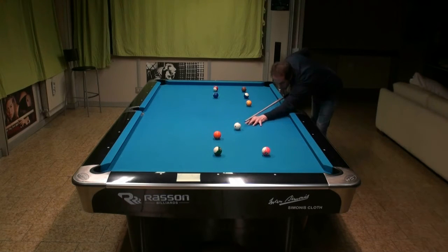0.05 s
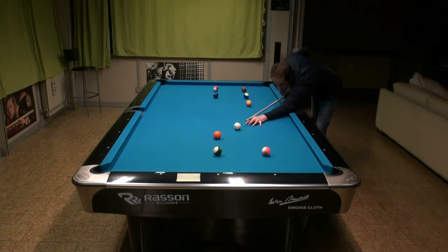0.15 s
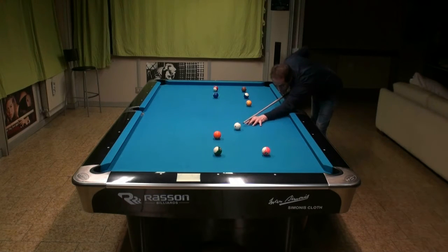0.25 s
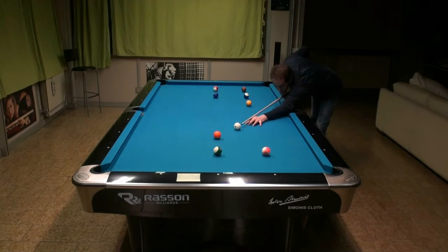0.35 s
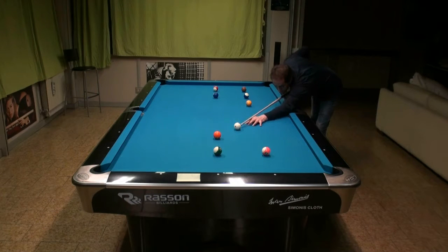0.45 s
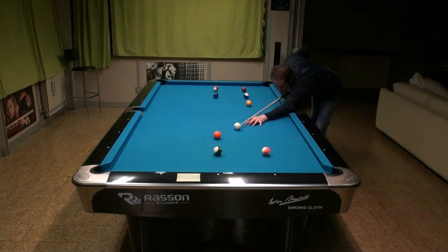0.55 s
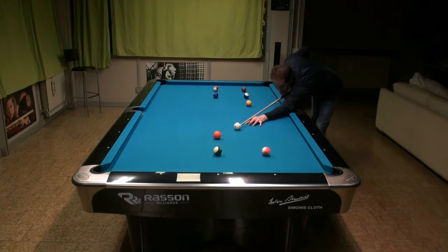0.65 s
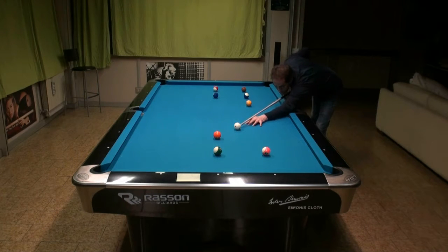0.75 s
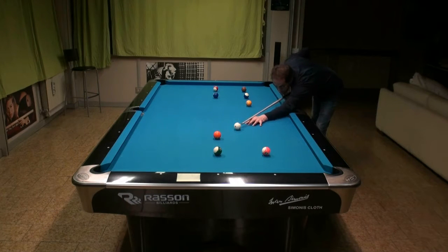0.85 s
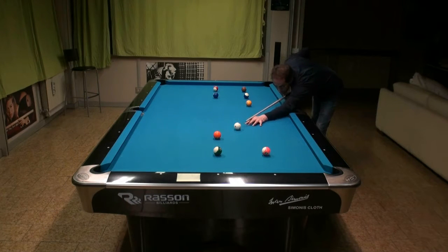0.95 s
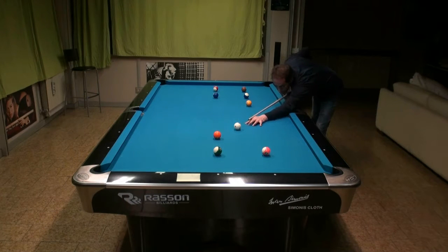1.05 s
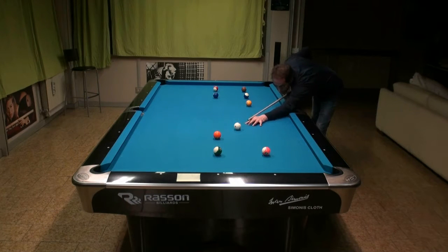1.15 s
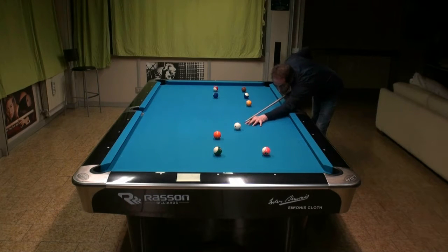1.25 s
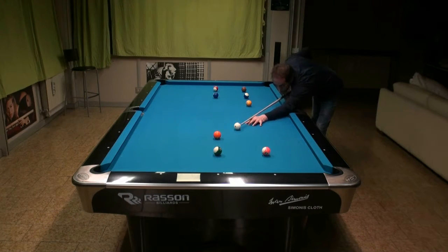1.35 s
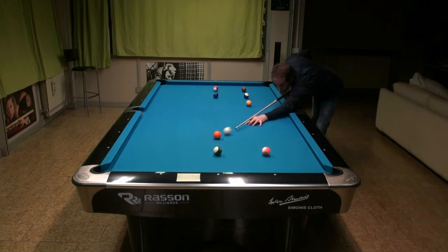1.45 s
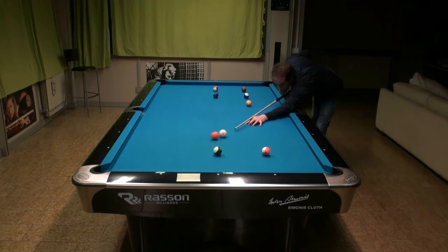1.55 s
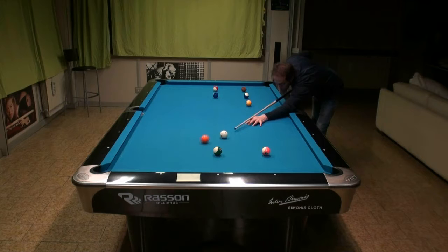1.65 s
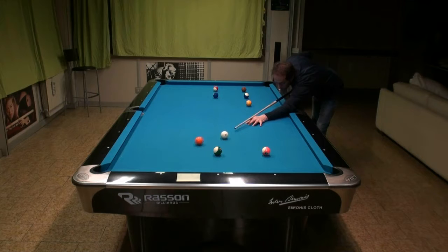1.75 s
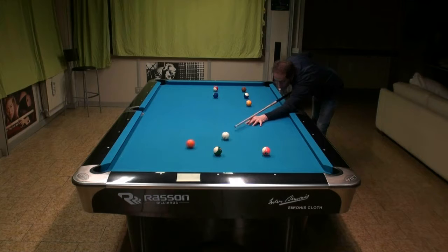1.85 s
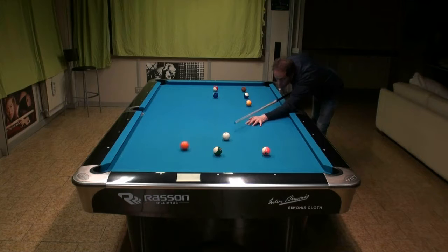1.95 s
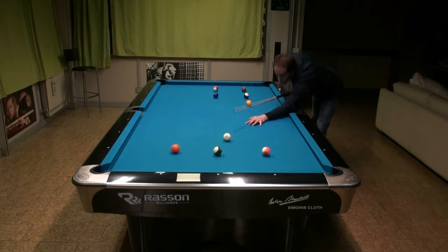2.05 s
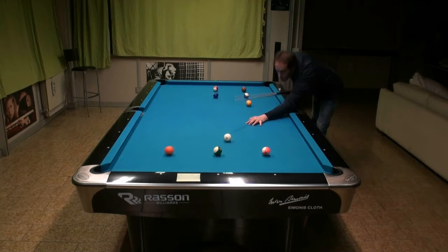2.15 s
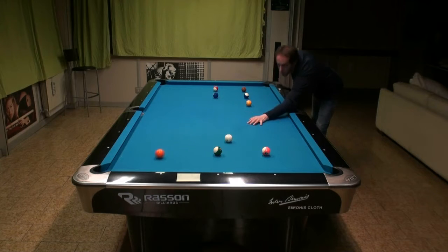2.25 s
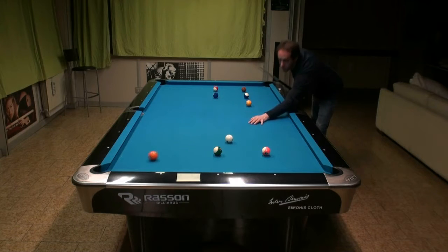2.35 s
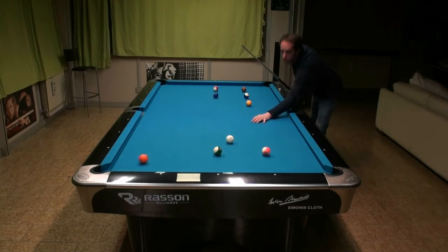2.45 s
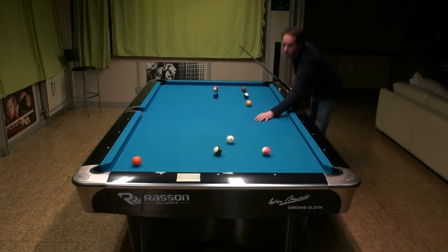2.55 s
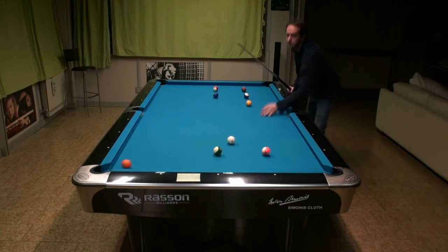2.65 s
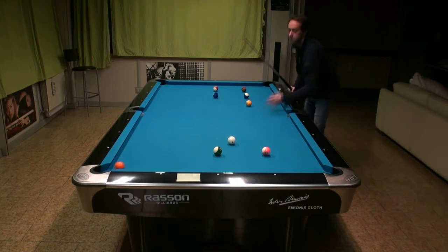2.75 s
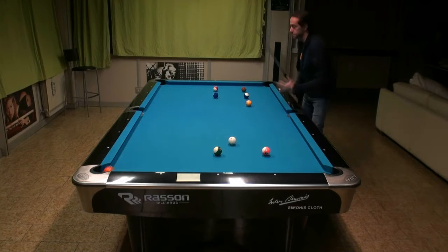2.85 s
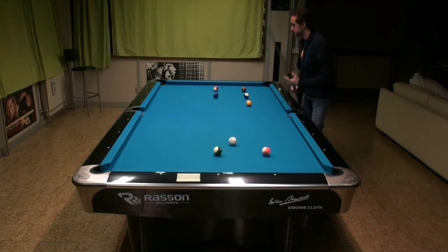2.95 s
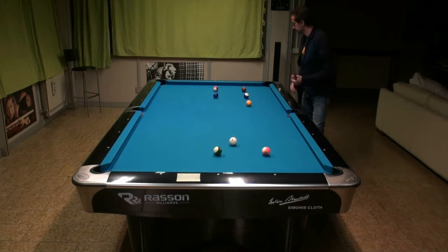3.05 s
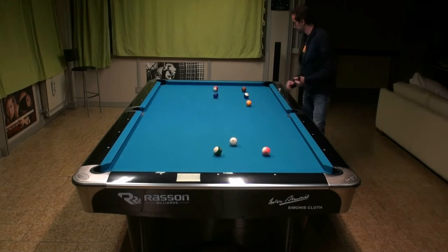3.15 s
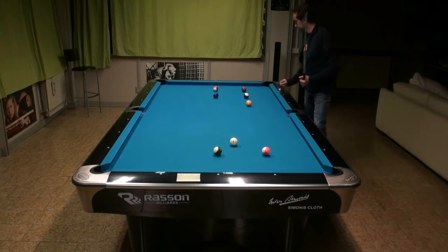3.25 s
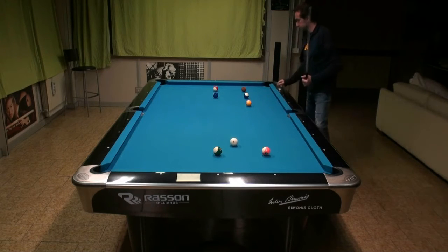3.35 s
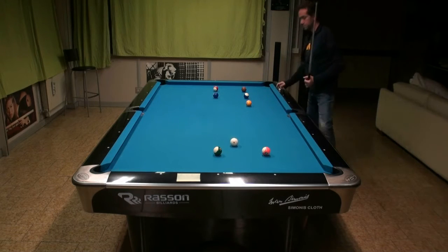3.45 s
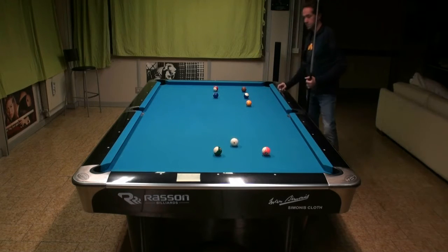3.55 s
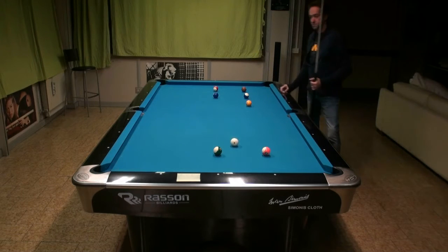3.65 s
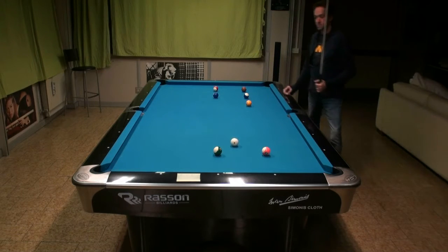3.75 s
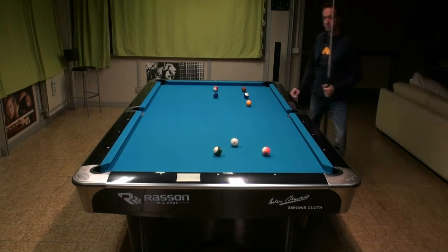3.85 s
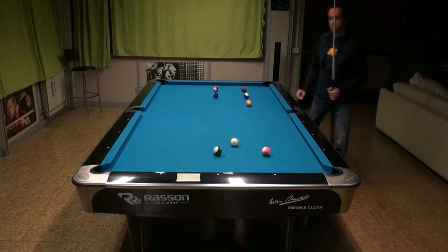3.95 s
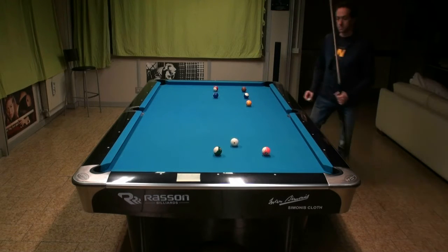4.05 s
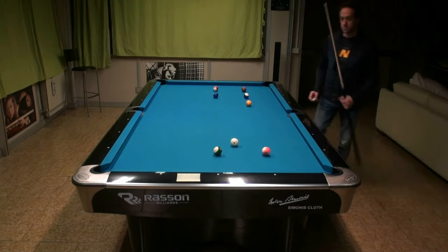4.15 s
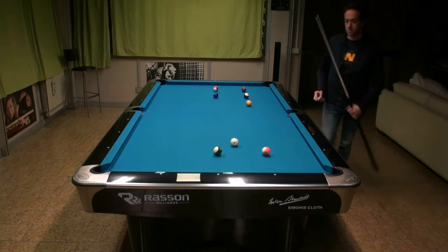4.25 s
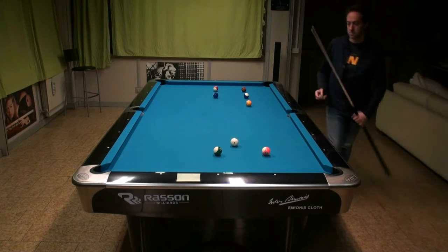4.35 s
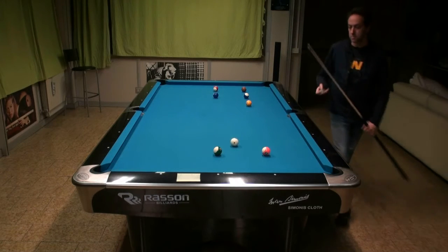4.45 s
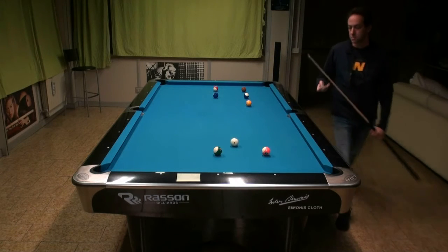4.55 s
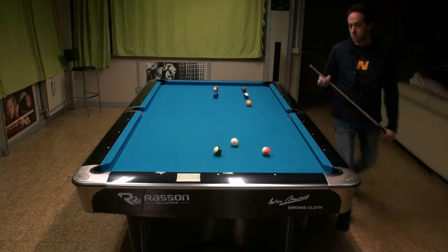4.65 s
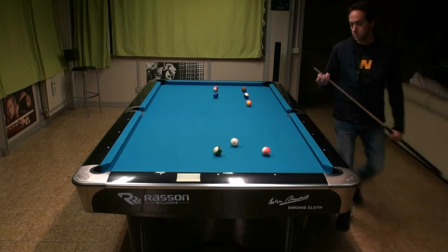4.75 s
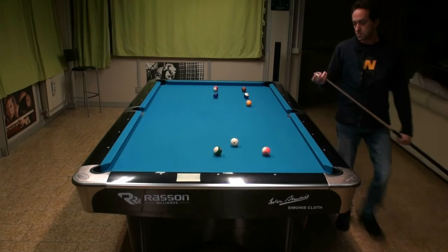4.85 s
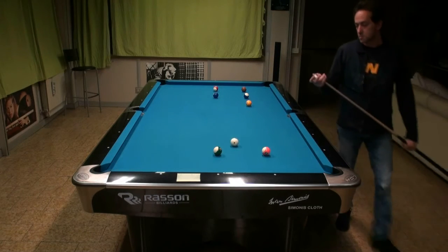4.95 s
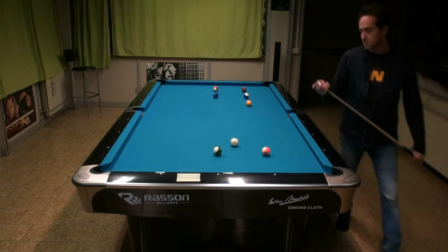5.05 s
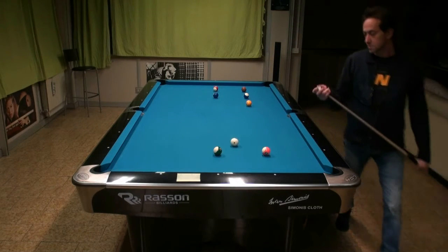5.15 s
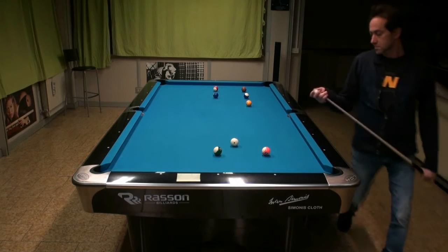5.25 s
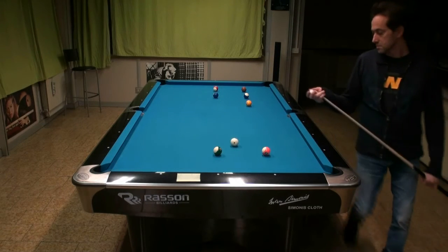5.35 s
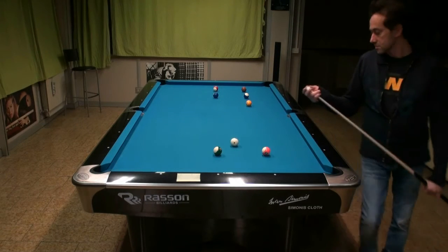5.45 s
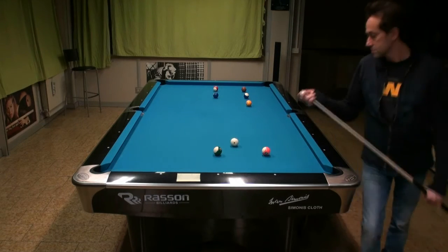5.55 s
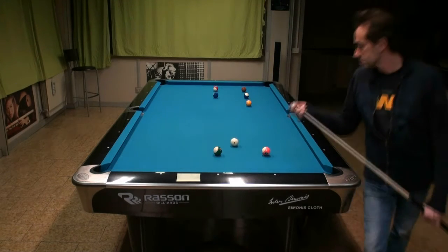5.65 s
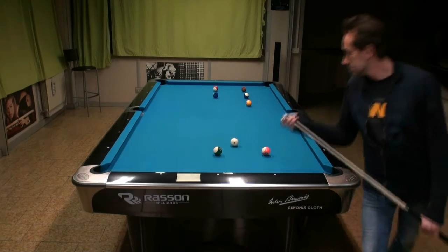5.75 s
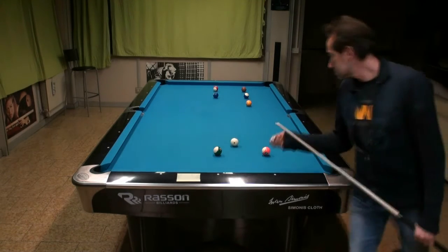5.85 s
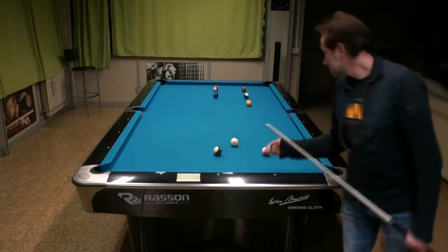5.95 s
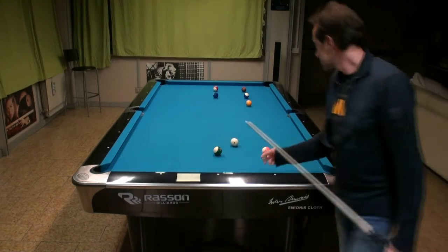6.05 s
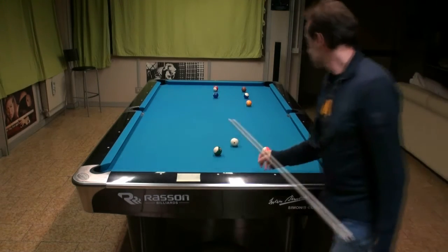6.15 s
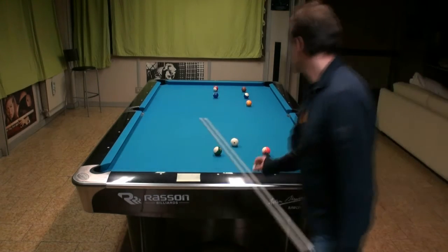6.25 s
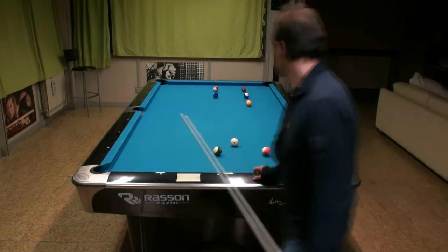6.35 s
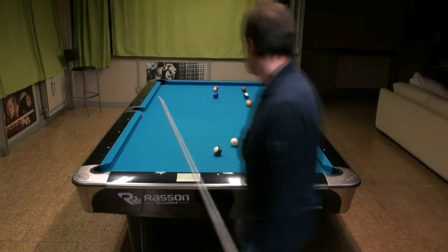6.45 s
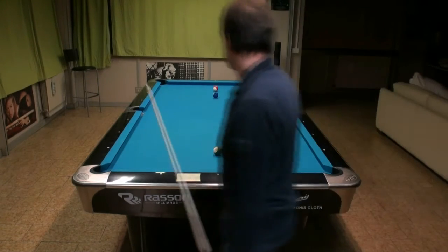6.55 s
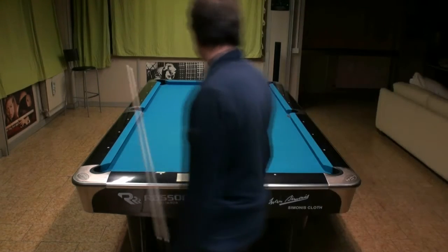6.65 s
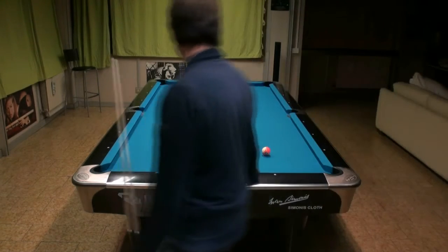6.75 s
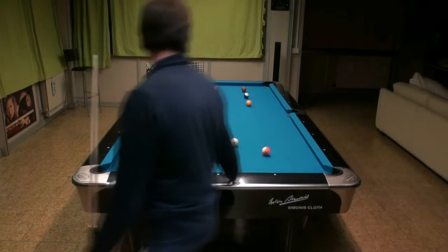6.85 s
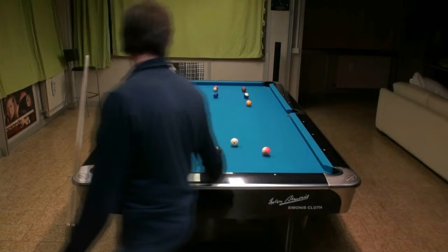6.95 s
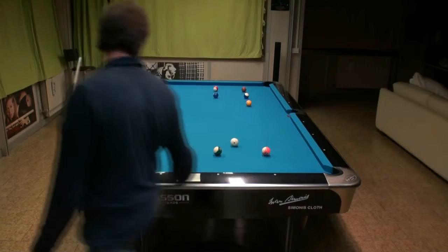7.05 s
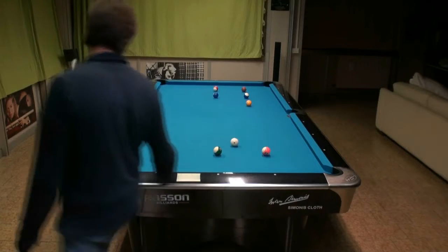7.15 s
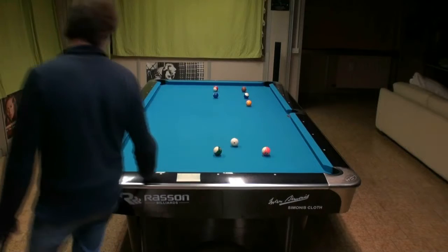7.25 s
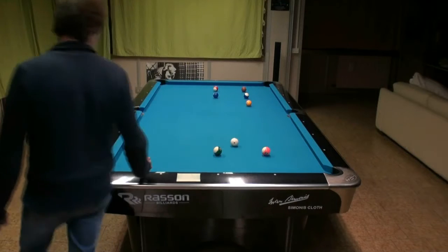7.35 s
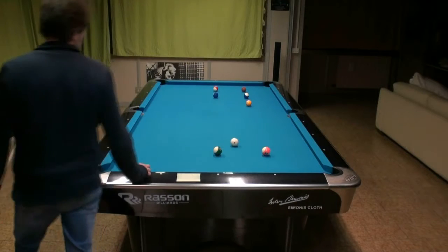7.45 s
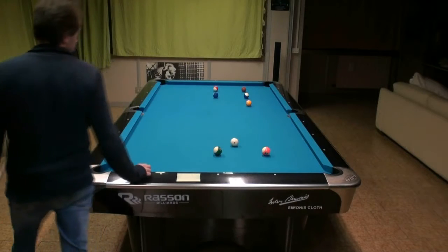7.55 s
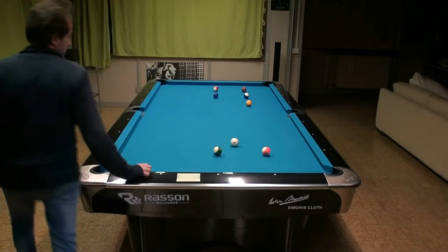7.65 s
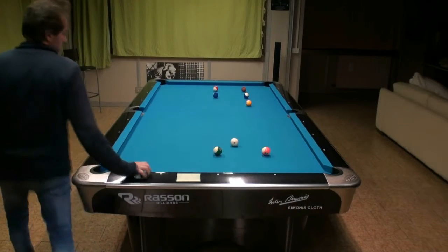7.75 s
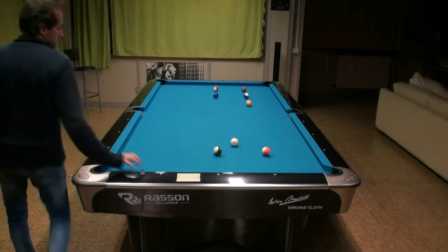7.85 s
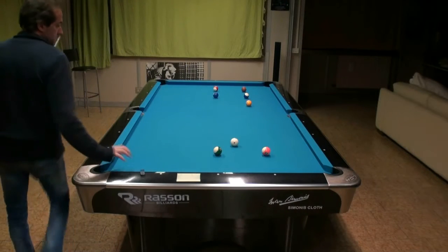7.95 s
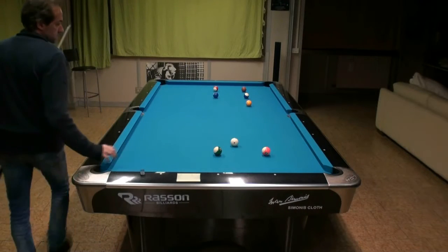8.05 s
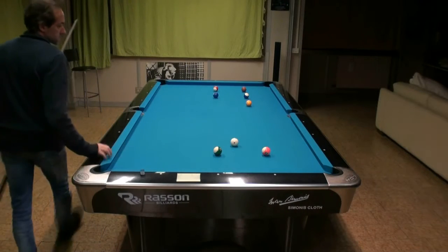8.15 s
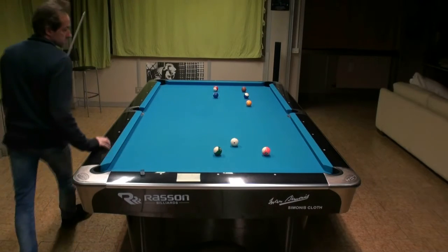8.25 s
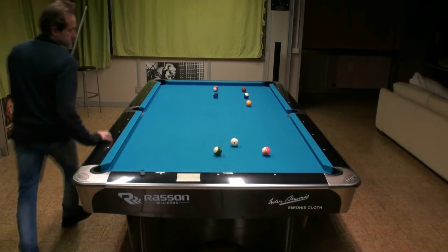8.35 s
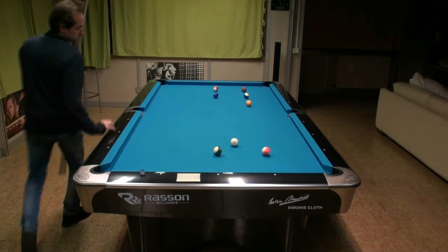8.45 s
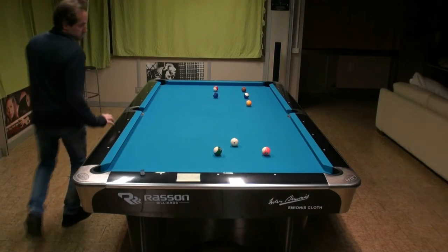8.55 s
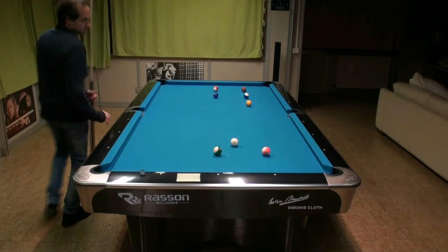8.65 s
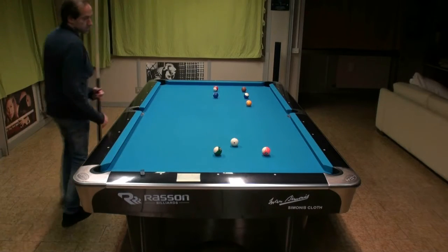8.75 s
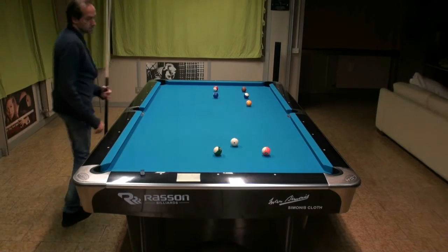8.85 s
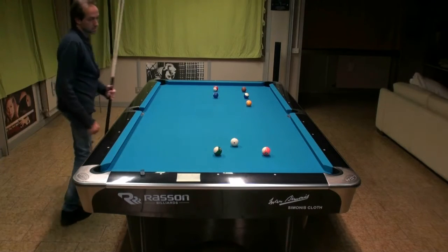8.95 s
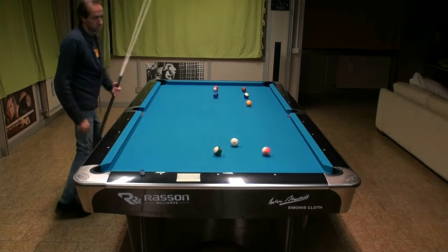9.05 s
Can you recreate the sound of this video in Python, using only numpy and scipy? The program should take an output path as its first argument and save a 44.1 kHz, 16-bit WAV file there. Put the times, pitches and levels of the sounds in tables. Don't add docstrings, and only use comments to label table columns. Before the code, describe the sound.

In a quiet, lightly echoing room, pool balls crack together, one drops clattering into the pocket, then shuffling steps and two wooden chalk taps.

```python
import sys
import numpy as np
from scipy import signal
from scipy.fft import rfft, irfft, next_fast_len
from scipy.io import wavfile
from scipy.ndimage import uniform_filter1d, minimum_filter1d, map_coordinates

SR = 44100
rng = np.random.default_rng(int(sys.argv[2]) if len(sys.argv) > 2 else 0)


def linear_from_db(decibels):
    return 10 ** (np.asarray(decibels, float) / 20)


def to_wav(s):
    ch = np.atleast_2d(s).T
    pcm = np.round(np.clip(ch, -1, 1) * 32767)
    wavfile.write(sys.argv[1], SR, pcm.astype(np.int16))


N = 401751
LEAD = 2048
SPAN, FAINT_SPAN = 30000, 14000
MAINS_HZ = 50.06
TOP_HZ, WIDE_HZ = 15800, 11600
STEP_ROOM_DB = -11.5
RISE_SHARE, EDGE_DB, ROUND = 0.46, 14, 0.91
UPRIGHT_S, STAND_S = 2.36, 0.3
STIR_RUB_DB, STIR_SHUFFLE_DB, STILL_RUB_DB, STILL_SHUFFLE_DB = -61.5, -58.5, -81, -77
GAP_HZ, LOBE_HZ, GAP_DB, LOBE_DB, FADE_DB = 4570, 2540, -45, -29.5, 2.5
DUCK_HZ, DUCK_DB, DUCK_S = 220, -34, 0.085

# (time [s], direct level [dB], room level [dB])
CUE_BLOWS = [
    (1.4848, -13.5, -34),
    (1.494, -22, -39.5),
    (1.4968, -25, -35),
]
CLACKS = [
    (1.6494, 0, -21),
    (1.6517, -5, -24),
    (1.6573, -30, -44),
    (1.6589, 0, -36),
    (1.6602, -18, -32),
]
POCKET_CLACKS = [
    (3.1075, -33, -48),
    (3.1102, -4, -16.5),
    (3.1131, 4, -16),
    (3.122, -12, -21),
    (3.139, -3, -22),
]
REBOUND_CLACKS = [
    (3.3138, -7, -21),
    (3.3165, -8.5, -22.5),
    (3.326, -20, -40),
    (3.335, -17, -46),
    (3.344, -20, -36),
    (3.36, -13, -35),
    (3.389, -20, -34),
    (3.43, -33, -35.5),
    (3.47, -30, -59),
]
POCKET_THUDS = [
    (3.112, -13.5, -22.5),
    (3.14, -26, -26),
    (3.32, -15, -27),
    (3.39, -19.5, -30),
    (3.43, -41, -39.5),
    (3.49, -24, -49),
    (3.512, -24, -40),
    (3.53, -30, -57),
    (3.565, -35, -52),
]
SETTLING = [
    (3.8535, -15.5, -31),
    (3.86, -25, -33.5),
    (3.875, -17.5, -41),
    (3.897, -27, -37),
    (3.93, -29, -39),
    (3.955, -35, -59),
]
CHALK_DOWN = [
    (6.4545, -7, -20.5),
    (6.46, -7, -29.5),
    (6.464, -11, -34),
]
CHALK_DOWN_AGAIN = [
    (7.554, -13.5, -26),
    (7.557, -13.5, -28.5),
    (7.562, -15.5, -45),
]
CHALK_TICKS = [(4.154, -43, -57), (4.576, -48, -55), (5.041, -46, -55), (5.544, -33.5, -51),
               (5.56, -56, -48), (5.74, -33, -39.5), (6.222, -60, -53), (7.106, -45, -54), (8.41, -44, -51)]
SNAPS = [(3.1102, -36, -52), (3.3165, -36, -47), (3.388, -26, -48.5), (4.425, -31.5, -44),
         (5.742, -46, -65), (6.453, -26, -60), (6.461, -32, -62), (6.822, -43, -54), (6.85, -42, -53.5),
         (7.5535, -25, -52), (8.145, -43, -68)]
EDGE_CLICKS = [
    (3.8535, -36, -44),
    (6.4518, -11, -35),
    (6.4545, -12, -29),
    (7.5508, -32, -50),
    (7.5535, -9.5, -34),
]
SCUFFS = [(2.57, -52, -65), (2.62, -52, -59), (4.8, -47, -68), (5.2, -59, -66), (6.052, -38.5, -56),
          (6.222, -38, -56), (6.24, -42, -61), (8.412, -49, -52), (8.53, -43, -65), (8.62, -48, -63)]
# (time [s], direct level [dB])
STEPS = [(2.03, -52), (4.428, -36.5), (4.662, -46.5), (4.798, -49), (4.826, -64), (5.197, -41),
         (5.422, -43), (5.805, -37), (6.053, -46.5), (7.06, -40), (7.354, -52), (7.77, -38.5), (8.121, -45),
         (8.41, -43.5)]

# (frequency [Hz], level per Hz [dB])
CUE = [(53, -61), (90, -29), (145, 0), (407, -1.5), (443, -2), (586, -0.5), (1300, -9.5), (1420, -24),
       (1550, -13), (1690, -21.5), (2710, -13.5), (4350, -31), (15500, -39.5)]
BALLS = [(53, -45), (90, -27), (210, -13.5), (600, -16.5), (1000, -10), (1700, 0.5), (2250, 2),
         (3000, -3.5), (3600, -14), (4100, -22)]
BALL_HEAP = [(470, -51), (800, -17), (929, -14.5), (989, -13), (1240, -7.5), (1690, -10.5), (1940, -2),
             (2330, 0), (2640, -6.5), (3110, 0), (4990, -29), (5900, -24.5), (10400, -39.5), (14700, -35)]
REBOUND = [(470, -36), (800, -16), (1200, -9), (1660, -10), (2320, -4), (2570, -15), (3090, -7),
           (4430, -33), (5340, -30), (6900, -50), (15500, -40)]
POCKET = [(41, -55), (70, -12.5), (124, -2.5), (168, -14.5), (253, -4), (441, -5), (490, -5), (823, -8),
          (1140, -5.5), (1840, -11.5), (5000, -34), (6500, -67), (11000, -120)]
TRAY = [(53, -46), (90, -6), (138, -1), (177, -3.5), (309, 5), (463, -1), (540, 8), (735, -3.5),
        (1470, -2.5), (1720, -3), (2600, -4.5), (3100, -15), (4400, -19), (7000, -31), (11700, -57),
        (19800, -120)]
RAIL = [(53, -53), (90, -39), (124, -8.5), (172, -26), (314, -10), (357, -5.5), (415, 0), (550, -8.5),
        (793, -6.5), (1050, -9.5), (1450, -6), (1700, -4), (2300, -10), (2890, -8.5), (4600, -18.5),
        (6500, -28.5), (12500, -42.5), (14500, -55)]
RAIL_CORNER = [(53, -34), (90, -21), (138, -9.5), (195, -25), (232, -6.5), (373, -3.5), (527, -3),
               (626, -8.5), (759, -3), (1360, -6.5), (1720, 2.5), (2140, -5), (2890, -6.5), (4950, -12.5),
               (6500, -24), (9000, -31.5), (15500, -44)]
FERRULE = [(400, -12), (900, -7), (1300, 1), (2100, -4.5), (3700, -3.5), (4500, -22), (9000, -35),
           (16000, -50)]
EDGE = [(800, -24), (2000, 3.5), (3200, 13), (4500, -7), (6500, -38), (16000, -23)]
SNAP = [(800, -19), (2500, 1.5), (4500, -1.5), (7000, 0), (11000, -9.5), (16000, -16)]
SHOE = [(60, -21), (150, -5), (350, -2.5), (700, -5.5), (1800, -10.5), (3500, -15), (9000, -21),
        (16000, -29)]
SCUFF = [(250, -27), (550, -8), (1100, 0), (1600, -1.5), (2300, -7), (2900, -15), (6000, -28)]
SHUFFLE = [(200, -5.5), (500, -0.5), (1500, -1), (2500, -5.5), (4000, -10), (6000, -23)]
RUB = [(700, -30), (1300, -5), (2500, 2.5), (4000, 3), (7000, 2.5), (10000, -3), (12500, 0), (15500, -10.5)]
HISS = [(25, -15), (70, -2), (130, -3.5), (250, -3.5), (500, -2), (900, -1), (1500, -3), (3000, -7),
        (6000, -14), (11000, -18), (13000, -14.5), (16000, -18.5)]

# (frequency [Hz], likeness [0 to 1])
HISS_ALIKE = [(130, 0.92), (300, 0.13), (640, 0.018), (3000, 0.041), (7000, 0.16)]
ROOM_ALIKE = [(130, 0.99), (300, 0.98), (640, 0.73), (3000, 0.75), (7000, 0.82)]
# (frequency [Hz], time to fall 60 dB [s])
ROOM = [(80, 1.14), (260, 0.51), (700, 0.55), (1800, 0.51), (5000, 0.55), (12000, 0.62)]
# (multiple of the mains frequency [1], level [dB rms])
HUM = [(1, -50), (2, -68), (4, -61.5), (6, -65), (8, -69), (10, -99)]

# (frequency [Hz], width [Hz], level [dB])
SHAFT_MODES = [(1560, 40, 2), (1790, 36, 9), (2040, 42, 4), (2400, 52, -6), (2660, 60, -7), (3120, 41, -1),
               (3410, 45, 0)]
SLATE_MODES = [(118, 9.4, 4), (216, 12, -11)]
HEAP_MODES = [(334, 40, 0), (937, 18, 7), (1250, 39, 2.5), (1560, 27, 0), (1958, 11, 4), (2250, 32, 2),
              (2353, 18, 1), (2690, 20, 5.5), (2900, 18, -2), (3140, 35, -8)]
REBOUND_MODES = [(910, 19, -13), (1900, 15, 4), (2283, 18, 3.5), (2400, 21, 3), (2680, 48, 5.5)]
LINER_MODES = [(319, 41, -6), (598, 16, 2.5), (493, 6.8, 5), (1130, 29, 2)]
TRAY_MODES = [(313, 39, -11), (934, 47, 5.5), (1180, 150, 4), (1482, 32, 13), (1826, 26, 10.5),
              (2330, 27, -2), (2460, 21, 6), (3940, 26, -16)]
RAIL_MODES = [(555, 35, 4), (1280, 23, -3), (1678, 40, -1.5), (1813, 27, -1.5), (2860, 92, -6.5),
              (4100, 200, -10)]
CORNER_MODES = [(440, 65, 4), (1004, 27, 1), (1720, 20, 3.5), (2400, 30, 4), (2800, 54, 1), (3730, 80, -4),
                (4900, 180, -18)]
FERRULE_MODES = [(1284, 24, 0), (1810, 50, 6), (1990, 160, 4), (2490, 23, 9), (2630, 23, 5)]

# (time [s], peak level [dB], frequency [Hz], time to fall 60 dB [s]) # knocks of
KNOCKS = [(1.4855, -23.5, 620, 0.06), (1.497, -27, 665, 0.05), (1.6575, -21, 2400, 0.014),
          (1.672, -13, 1900, 0.017), (1.699, -15, 2400, .03), (1.726, -19, 1900, .03),
          (3.1205, -11, 3070, .03), (3.1285, -15, 3030, .02), (3.138, -8, 2110, 0.034),
          (3.157, -20, 2400, .03), (3.172, -18, 3080, .03), (3.196, -12, 2360, .05),
          (3.2125, -24, 2300, .03), (3.325, -14, 2300, .025), (3.335, -16, 2290, 0.033),
          (3.337, -22, 950, 0.032), (3.359, -10.5, 2280, 0.024), (3.388, -25, 1250, 0.037),
          (3.4, -27, 2400, .06), (3.467, -27, 2300, 0.027), (3.488, -27.5, 1900, .04),
          (3.488, -28, 520, 0.099), (3.508, -24, 573, 0.048), (3.528, -26.5, 532, 0.079),
          (3.56, -35, 560, 0.037), (3.603, -38, 596, 0.045), (3.857, -24, 1250, .05),
          (3.861, -23, 1620, 0.048), (3.859, -39, 3930, 0.096), (3.875, -27, 1510, .03),
          (3.858, -44, 4900, .05), (3.93, -30, 1480, .08), (3.945, -30, 561, 0.17),
          (6.4565, -24, 1770, 0.027), (6.459, -12, 2800, 0.027), (6.459, -11, 1820, 0.053),
          (6.453, -25, 4700, 0.044), (6.462, -33, 5300, .03), (6.469, -13, 547, 0.099),
          (6.486, -19, 1635, 0.04), (6.511, -27, 1730, .03), (7.5565, -27, 1760, 0.027),
          (7.558, -24, 945, 0.061), (7.5565, -28, 3770, 0.026), (7.585, -32, 1740, 0.027),
          (7.598, -22, 1760, .04), (7.6616, -37, 1720, .04)]
TICKS = [(2.03, -54, 124, .3), (4.159, -43, 466, .05), (4.427, -40, 377, 0.051), (4.576, -45, 2330, 0.064),
         (5.545, -33, 2050, 0.035), (5.555, -40, 1250, 0.1), (5.743, -36, 2080, .05),
         (4.662, -43, 674, .07), (4.797, -41, 694, 0.037), (4.826, -46, 900, .04), (5.068, -54, 1450, .04),
         (5.195, -40, 250, 0.039), (5.205, -51, 1750, .15), (5.265, -40, 195, 0.051),
         (5.375, -43.5, 1280, 0.13), (5.421, -47, 444, 0.033), (5.745, -36, 2860, .05),
         (5.81, -44, 397, 0.033), (5.752, -37, 2090, .04), (5.847, -41, 1500, 0.061),
         (5.768, -41, 1490, .04), (6.822, -41, 2900, 0.037), (6.928, -48, 1200, 0.037),
         (7.057, -46, 552, .05), (7.096, -39.5, 580, .05), (7.28, -44, 835, 0.056), (7.352, -43, 1105, .05),
         (7.783, -36.5, 159, 0.076), (8.122, -53, 640, .05), (8.409, -46, 1560, .06)]
RINGS = [(1.492, -22.5, 814, .03), (1.508, -28.5, 500, 0.069), (3.3158, -6, 2400, .015),
         (3.3235, -11, 2400, .03), (3.3435, -18, 2500, .03), (3.377, -21, 2400, .05),
         (3.315, -17.5, 1206, .06), (3.854, -27, 2800, 0.065), (3.872, -44, 4050, .06),
         (3.895, -42, 3950, .07), (5.5585, -32, 1500, .03), (6.4545, -18, 3270, 0.038),
         (6.497, -27, 554, .12), (6.525, -28, 555, 0.13), (6.503, -22, 1668, .08), (6.505, -26, 2860, 0.15),
         (7.553, -15, 3600, .012), (7.5615, -17, 2500, .02), (7.555, -29, 5600, 0.036),
         (7.575, -28, 2970, .1), (2.585, -52, 1513, .4), (5.7385, -37, 2200, .03)]

# (peak time [s], length [s], rub level [dB], shuffle level [dB])
GESTURES = [(0.03, 0.97, -56.5, -53.5), (2.594, 0.49, -52, -49), (2.726, 0.27, -52, -69),
            (3.716, 0.15, -51, -55), (3.822, 0.15, -48.5, -61), (4.18, 0.15, -58, -42),
            (4.449, 0.074, -43.5, -39), (4.673, 0.82, -56, -48.5), (5.256, 0.19, -50.5, -41.5),
            (5.4, 0.15, -43.5, -43), (5.667, 0.25, -49.5, -46.5), (5.846, .17, -39, -38.5),
            (6.04, 1, -68, -45.5), (6.33, 0.99, -54, -57), (6.78, 0.26, -66, -45), (7.21, 1, -53, -45.5),
            (7.878, 0.6, -53.5, -45.5), (8.428, 0.65, -56, -47), (8.56, 0.66, -57.5, -48.5),
            (9.1, 0.38, -51, -45.5)]
# (start [s], end [s], lowest lost frequency [Hz])
BLANKS = [
    (1.633, 1.647, 1000),
    (3.294, 3.313, 9500),
    (3.307, 3.31, 4430),
    (6.434, 6.448, 1130),
    (7.543, 7.5497, 700),
]


def along(points, hz):
    f, v = np.transpose(points)
    return np.interp(np.log(hz + 1), np.log(f + 1), v)


def unit(x):
    return x / np.sqrt(np.mean(x ** 2) + 1e-20)


def wobble(rate):
    knots = rng.standard_normal(int(N * rate / SR) + 4)
    return map_coordinates(knots, [np.arange(N) * rate / SR])


def above(x, edge_hz):
    size = next_fast_len(x.shape[-1] + LEAD)
    keep = np.clip((np.fft.rfftfreq(size, 1 / SR) - edge_hz) / 200 + 0.5, 0, 1)
    return irfft(rfft(x, size) * keep, size)[..., :x.shape[-1]]


def stereo(pair, alike, hz):
    turn = np.arccos(np.clip(along(alike, hz), -1, 1)) / 2
    mid, side = pair[0] * np.cos(turn), pair[1] * np.sin(turn)
    return np.array([mid + side, mid - side])


def rush(spectrum, alike, patchy_db):
    hz, _, z = signal.stft(rng.standard_normal((2, N)), SR, nperseg=1024)
    field = uniform_filter1d(rng.standard_normal(z.shape[1:]), size=10, axis=0)
    field = uniform_filter1d(field, size=6, axis=1)
    z = z * linear_from_db(patchy_db * unit(field) + along(spectrum, hz)[:, None])
    return unit(signal.istft(stereo(z, alike, hz[:, None]), nperseg=1024)[1][:, :N])


def tail(build_s, slower, span):
    hz, t, z = signal.stft(rng.standard_normal((2, SPAN))[:, :span], SR, nperseg=512)
    z = stereo(z, ROOM_ALIKE, hz[:, None]) * linear_from_db(-60 * t / (slower * along(ROOM, hz)[:, None]))
    build_up = 1 - np.exp(-(np.arange(span) / SR / build_s) ** 2)
    x = signal.istft(z, nperseg=512)[1][:, :span] * build_up
    return x / np.sqrt(np.mean(x[:, :SR // 20] ** 2))


def scatter(smear_s):
    x = rng.standard_normal(LEAD) * np.exp(-np.arange(LEAD) / SR / smear_s)
    x[0] = 2
    return x / np.linalg.norm(x)


def contacts(rows, spectrum, modes=(), ringing=1, pan_db=0.1, build_s=0.006, slower=1.01, lift_db=6,
             smear_s=0.011, soft_hz=9000, span=SPAN, blur_db=-1, wet_pan_db=0.0):
    size = 2 ** int(np.log2(span) + 1)
    hz = np.fft.rfftfreq(size, 1 / SR)
    log_gain = np.log(linear_from_db(along(spectrum, hz)) + 1e-6)
    cepstrum = irfft(log_gain, size)
    cepstrum[1:size // 2] *= 2
    cepstrum[size // 2 + 1:] = 0
    phase = np.clip(ringing, 0, 1) * rfft(cepstrum).imag
    colour = -np.exp(log_gain + 1j * phase)
    rings = sum(linear_from_db(db + lift_db) * 1j * hz * w / (c * c - hz * hz + 1j * hz * w + 1e-9) for c, w, db in modes)
    far = colour * (1 + linear_from_db(blur_db) * rings)
    colour = colour * (1 + rings)
    small = hz ** 2 / (hz ** 2 + 220 ** 2) / (1 + (hz / soft_hz) ** 4)
    sides = np.array([[0.5], [-0.5]])
    far = far * linear_from_db(wet_pan_db * sides) / np.linalg.norm(irfft(far, size))
    out = np.zeros((2, N + size + LEAD))
    for s, direct_db, room_db in rows:
        blow = small * rfft(scatter(smear_s), size)
        peak = np.abs(irfft((blow * colour)[::8])).max()
        direct = blow * linear_from_db(direct_db + pan_db * sides) / peak
        room = linear_from_db(room_db) * rfft(tail(build_s, slower, span), size) * far
        delay = np.exp(-2j * np.pi * hz * (LEAD / SR + s % (1 / SR)))
        out[:, int(s * SR):][:, :size] += irfft((direct * colour + room) * delay, size)
    return out[:, LEAD:LEAD + N]


def knocks(rows, attack_s, spread, room_db):
    x, t = np.zeros(N + LEAD * 4), np.arange(LEAD * 4) / SR
    for (s, db, hz, t60), (apart, phase) in zip(rows, rng.uniform(-1.01, 1, (len(rows), 2))):
        pair = np.sin(2 * np.pi * hz * t)
        pair += 0.5 * np.sin(2 * np.pi * hz * (1 + spread * apart) * t + np.pi * phase)
        x[int(s * SR):][:len(t)] += linear_from_db(db - 60 * t / t60) * (1 - np.exp(-t / attack_s)) * pair
    answer = tail(0.0044, 0.71, FAINT_SPAN)
    answer = answer / np.linalg.norm(answer[0])
    return x[:N] + linear_from_db(room_db) * signal.oaconvolve(x[None, :N], answer, axes=1)[:, :N]


def background():
    turn = 2 * np.pi * np.cumsum(MAINS_HZ + 0.0752 * wobble(0.589)) / SR
    hum = 0
    for k, db in HUM:
        level = np.sqrt(2) * linear_from_db(db + 0.22 * wobble(6.4) + 1.66 * wobble(90))
        hum = hum + level * np.sin(k * turn + rng.uniform(0, 2 * np.pi))
    return hum + linear_from_db(-53.0) * rush(HISS, HISS_ALIKE, patchy_db=-0.3)


def ducking(x):
    mono = x.mean(axis=0)
    memory = int(DUCK_S * SR)
    power = (mono - above(mono, DUCK_HZ)) ** 2
    bass = np.abs(uniform_filter1d(power, size=memory, origin=(memory - 1) // 2))
    return 1 / np.sqrt(1 + bass / linear_from_db(2 * DUCK_DB))


def swells(column, still_db, stir_db):
    t = np.arange(N) / SR
    power = linear_from_db(2 * np.interp(t, [UPRIGHT_S - STAND_S, UPRIGHT_S], [still_db, stir_db]))
    for row in GESTURES:
        s, length = row[:2]
        near = slice(max(int((s - length) * SR), 0), int((s + 2 * length) * SR))
        share = np.where(t[near] < s, RISE_SHARE, 1 - RISE_SHARE)
        away = np.abs(t[near] - s) / (length * share)
        power[near] += linear_from_db(2 * (row[column] - EDGE_DB * away ** ROUND))
    return np.sqrt(power)


def player():
    shuffle = swells(column=3, still_db=STILL_SHUFFLE_DB, stir_db=STIR_SHUFFLE_DB) * linear_from_db(-6.0)
    shuffle = shuffle * rush(SHUFFLE, ROOM_ALIKE, patchy_db=1.5)
    rub = swells(column=2, still_db=STILL_RUB_DB, stir_db=STIR_RUB_DB) * linear_from_db(0.44 * wobble(40))
    rub = rub * rush(RUB, ROOM_ALIKE, patchy_db=2.0)
    snaps = contacts(SNAPS, SNAP, span=FAINT_SPAN, smear_s=0.0038, soft_hz=15000, build_s=0.0019, slower=0.93)
    footfalls = [(s, db, db + STEP_ROOM_DB) for s, db in STEPS]
    steps = contacts(footfalls, SHOE, span=FAINT_SPAN, smear_s=0.0025, pan_db=-2.0, build_s=0.0019, slower=1.0)
    scuffs = contacts(SCUFFS, SCUFF, span=FAINT_SPAN, smear_s=0.019, build_s=0.0093, slower=0.59)
    return shuffle + rub + snaps + steps + scuffs


def small_rings():
    bodies = knocks(KNOCKS, attack_s=0.00068, spread=0.084, room_db=-8)
    ticks = knocks(TICKS, attack_s=0.0012, spread=0.135, room_db=-3.0)
    return bodies + ticks + knocks(RINGS, attack_s=0.00085, spread=0.041, room_db=-13)


def hard_edges():
    return contacts(EDGE_CLICKS, EDGE, span=FAINT_SPAN, ringing=0.16, smear_s=0.00076, soft_hz=12000,
                    build_s=0.00097, slower=0.27)


def chalk():
    ticks = contacts(CHALK_TICKS, FERRULE, FERRULE_MODES, span=FAINT_SPAN, smear_s=0.0086, lift_db=1.5,
                     pan_db=-5.0, build_s=0.001, slower=0.7)
    first = contacts(CHALK_DOWN, RAIL, RAIL_MODES, blur_db=-8.5, wet_pan_db=0.3, smear_s=0.0032, soft_hz=9000,
                     lift_db=14.0, pan_db=1.0, build_s=0.001, slower=0.9)
    again = contacts(CHALK_DOWN_AGAIN, RAIL_CORNER, CORNER_MODES, blur_db=-10, wet_pan_db=0.2, smear_s=0.0051,
                     soft_hz=8000, lift_db=4.5, pan_db=-1.0, build_s=0.00086, slower=0.95)
    return ticks + first + again


def pocket():
    heap = contacts(POCKET_CLACKS, BALL_HEAP, HEAP_MODES, blur_db=-7.5, wet_pan_db=1.0, smear_s=0.00064,
                    soft_hz=12000, lift_db=10.5, ringing=0.26, pan_db=2.0, build_s=0.00081, slower=0.85)
    liner = contacts(POCKET_THUDS, POCKET, LINER_MODES, lift_db=5.0, pan_db=4.5, build_s=0.011, slower=1.0)
    rebound = contacts(REBOUND_CLACKS, REBOUND, REBOUND_MODES, blur_db=-7.0, wet_pan_db=0.2, smear_s=0.00064,
                       lift_db=9.5, ringing=0.2, pan_db=4.0, build_s=0.0012, slower=0.85)
    settling = contacts(SETTLING, TRAY, TRAY_MODES, blur_db=-13.5, span=FAINT_SPAN, smear_s=0.0071,
                        lift_db=13.5, pan_db=1.0, build_s=0.0088, slower=0.96)
    return heap + rebound + liner + settling


def lobes(count):
    points = []
    for k in range(count):
        for part, db in ((0, GAP_DB), (0.25, LOBE_DB), (0.7, LOBE_DB - 5.5)):
            points.append((GAP_HZ + (k + part) * LOBE_HZ, db - k * FADE_DB))
    return points


def shot():
    cue = contacts(CUE_BLOWS, CUE, SHAFT_MODES, blur_db=-3.5, span=FAINT_SPAN, lift_db=11.5, ringing=0.13,
                   smear_s=1e-5, soft_hz=1300, pan_db=0.0, build_s=0.0015, slower=0.71)
    clack = contacts(CLACKS, BALLS + lobes(count=5), SLATE_MODES, wet_pan_db=0.5, lift_db=5, smear_s=1e-5,
                     soft_hz=19000, ringing=0.044, pan_db=2.5, build_s=0.0047, slower=0.97)
    return cue + clack


def scene():
    floor = background()
    play = player() + small_rings() + hard_edges() + chalk() + pocket() + shot()
    return ducking(play) * floor + play


def limited(x, top):
    need = np.minimum(1, top / (np.abs(x).max(axis=0) + 1e-9))
    return x * uniform_filter1d(minimum_filter1d(need, size=129), size=65)


def top_cut(x):
    return signal.sosfilt(signal.butter(12, 16820, fs=SR, output="sos"), x)


def record(dry):
    x = limited(dry, 0.98)
    x = x - above(x, TOP_HZ)
    x = x - above(x - x.mean(axis=0), WIDE_HZ)
    for start, end, edge_hz in BLANKS:
        near = np.arange(-LEAD, LEAD) + int(start * SR)
        gate = np.clip(np.minimum(near / SR - start, end - near / SR) / 0.0027, 0, 1)
        x[:, near] -= gate * above(x[:, near], edge_hz)
    return top_cut(x)


dry = scene()
out = record(dry)
to_wav(out)
```